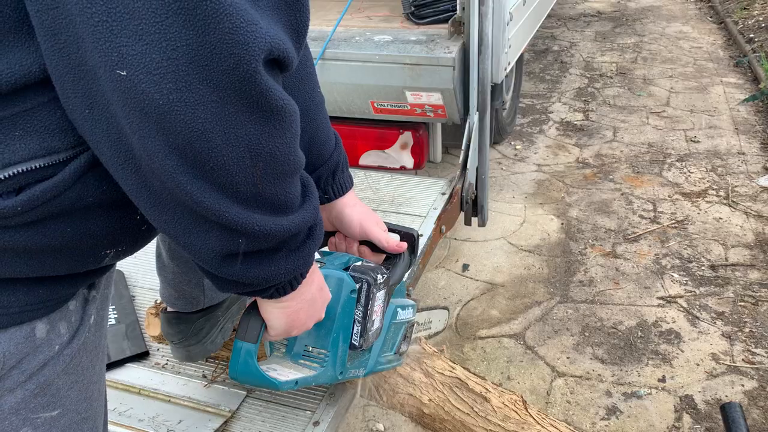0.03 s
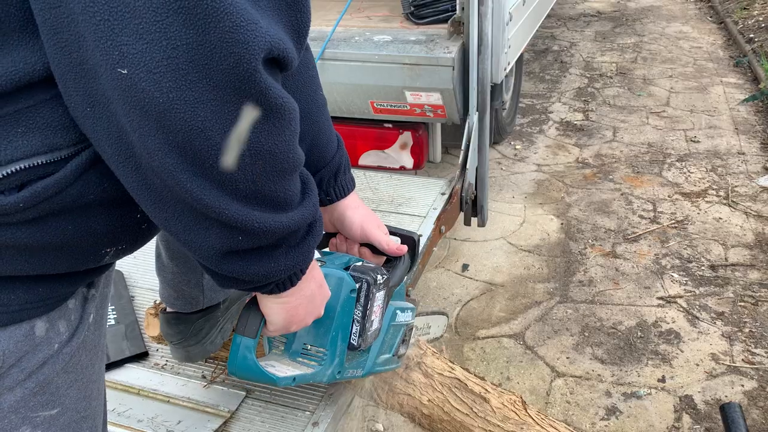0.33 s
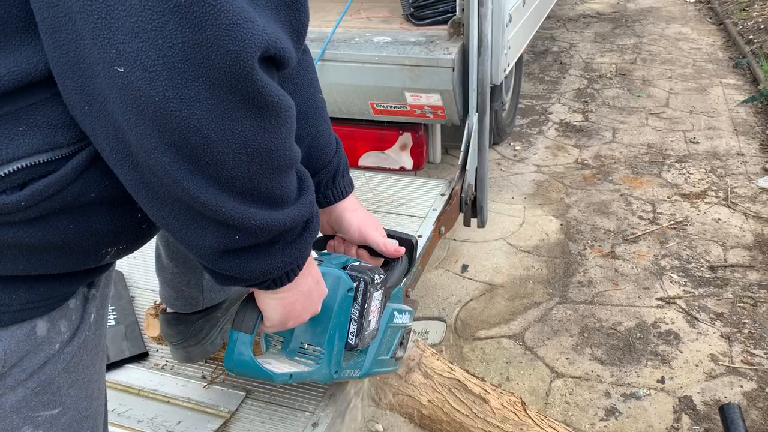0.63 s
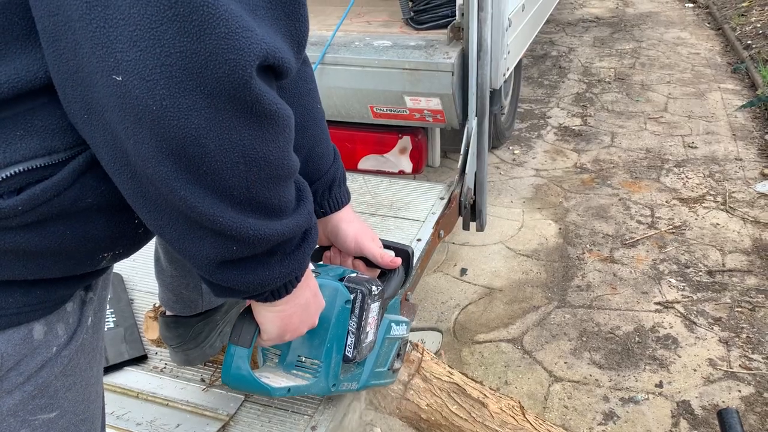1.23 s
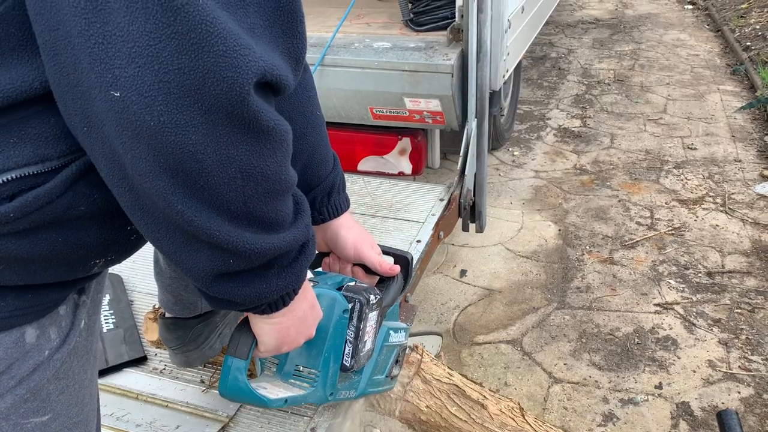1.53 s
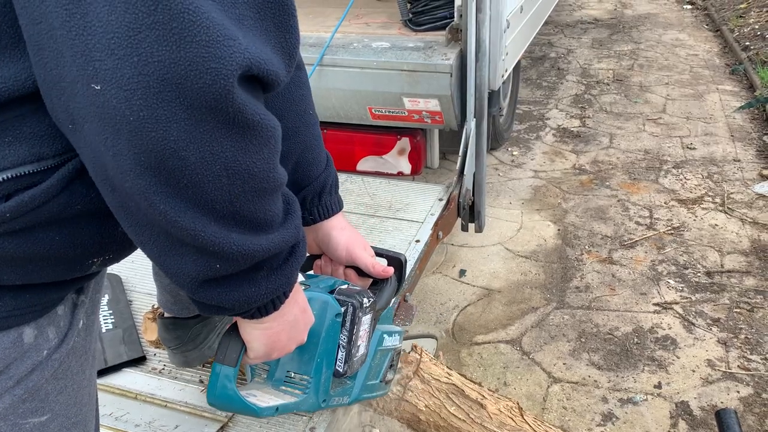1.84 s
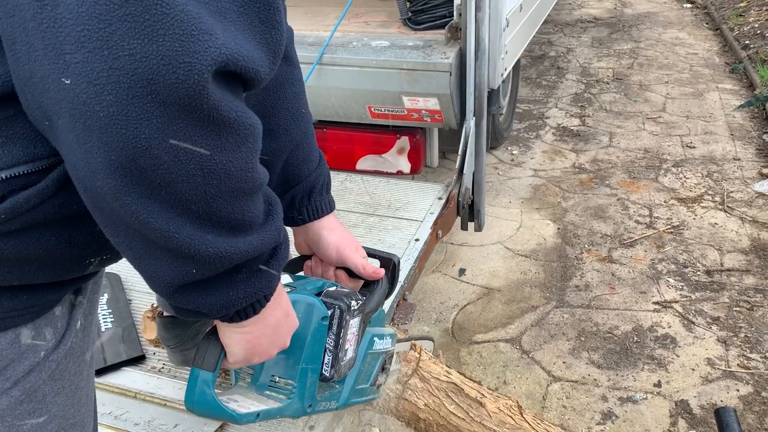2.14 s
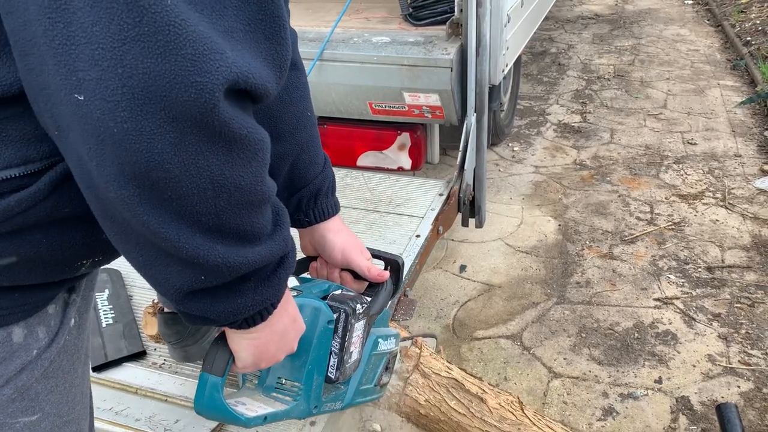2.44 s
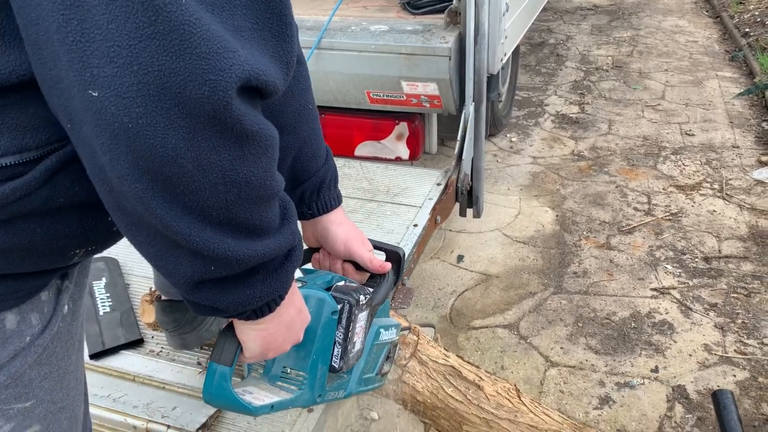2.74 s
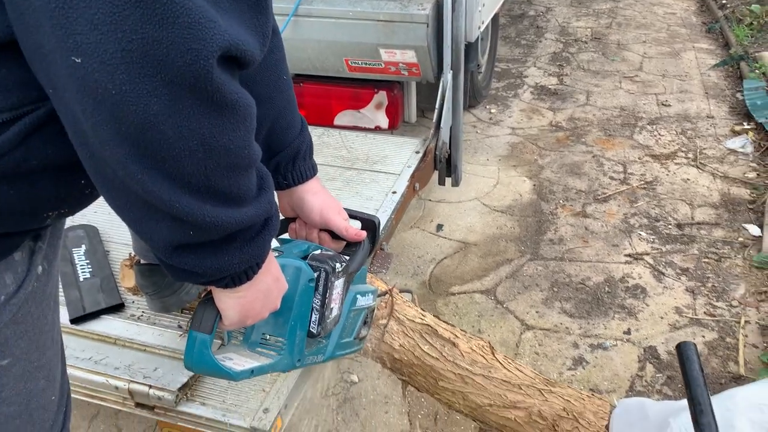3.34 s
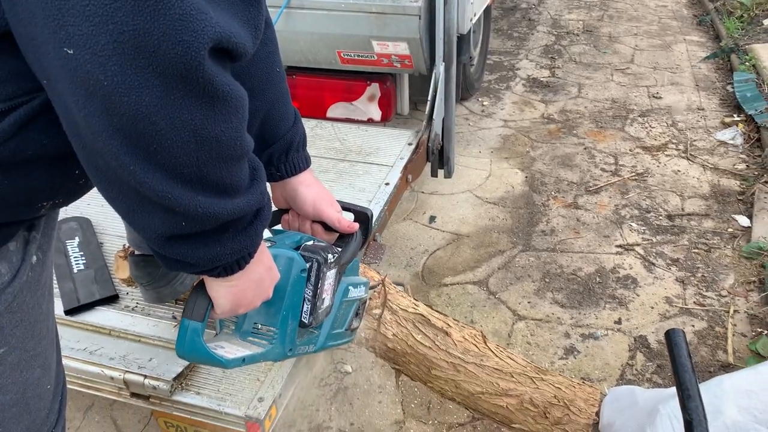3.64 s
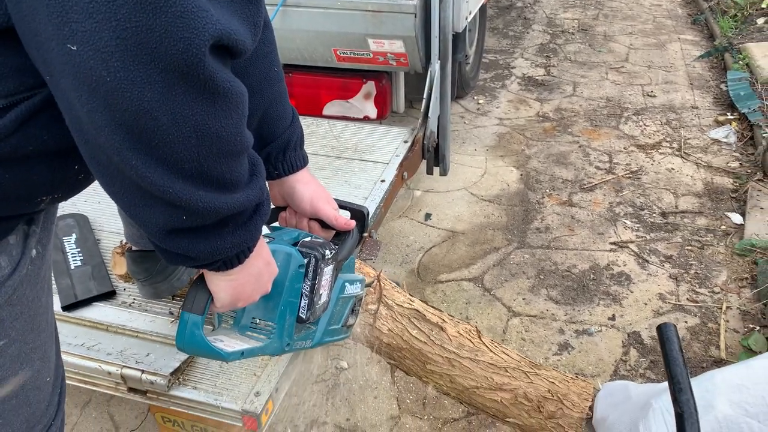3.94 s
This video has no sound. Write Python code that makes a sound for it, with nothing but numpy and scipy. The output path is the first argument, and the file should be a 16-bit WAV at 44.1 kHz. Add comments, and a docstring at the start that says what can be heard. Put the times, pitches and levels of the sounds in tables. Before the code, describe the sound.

Close electric chainsaw whining and rasping steadily as its chain bites into a log outdoors.

```python
"""After a moment of silence the sound cuts in on a running cordless chainsaw, close by on a paved yard.
Chain links meet a six-tooth drive wheel, whining and knocking on the housing,
while the chain rattles and hisses along its bar and chips crackle. The whine sinks under load.
From 0.8 s the cutters bite the log in spells, and the saw bounces and chatters in the cut.
Near the end two thin, high notes ring out briefly. A faint outdoor rumble lies under it all."""
import sys
import numpy as np
from scipy import signal
from scipy.fft import rfft, irfft
from scipy.io import wavfile
from scipy.ndimage import map_coordinates

SR = 44100
rng = np.random.default_rng(int(sys.argv[2]) if len(sys.argv) > 2 else 0)


def master(y):
    """Save y as 16-bit WAV."""
    cut = np.clip(np.atleast_2d(y).T, -1, 1)
    pcm = np.round(cut * 32767)  # scale
    wavfile.write(sys.argv[1], SR, pcm.astype(np.int16))


N = 176400
TIME = np.arange(N) / SR
FREQS = np.maximum(np.arange(N // 2 + 1) * SR / N, 1)


# how often links meet the drive wheel: t/s, f/Hz
LINK_RATE = [(0.0, 1059), (0.25, 1031), (0.42, 1004), (0.73, 985.7), (0.99, 960.8), (1.22, 952.9),
             (1.35, 936.5), (1.48, 926.2), (1.61, 934.2), (1.75, 923.1), (2.09, 941.3), (2.35, 940.5),
             (2.5, 952.3), (2.9, 944.2), (3.05, 964.4), (3.15, 935.4), (3.28, 964.8), (3.47, 953.5),
             (3.56, 930), (3.75, 915.6), (3.9, 885.4), (4.0, 904)]

def chain_motion():
    """The chain slows under load. Gives its link rate and a slightly wobbly count of links passed."""
    link_hz, = in_time(LINK_RATE)
    return link_hz, np.cumsum(link_hz * (1 + 0.00397 * drift(45))) / SR


# strength of the whine's tones 1, 2, 3 and 5: t/s, then level/dB for each
WHINE_LEVELS = [(0.06, -28, -46.5, -39, -31), (0.27, -30, -51, -32, -36.5), (0.42, -36.5, -43, -43.5, -39),
                (0.7, -37, -42.5, -37.5, -45), (0.88, -54, -42.5, -38.5, -42), (1.18, -55, -44, -36, -48),
                (1.32, -40.5, -58, -44, -53), (1.7, -40.5, -41, -43, -55), (2.1, -45.5, -61, -49, -46),
                (2.45, -42, -51, -49, -52), (2.75, -41, -47, -47, -46), (3.05, -38, -44, -40, -41),
                (3.15, -41, -45, -44, -42), (3.42, -40, -44, -36, -43), (3.6, -41, -43, -49, -45),
                (3.95, -43, -50, -55, -56)]
# tones 1 to 5: added level/dB, phase jitter/rad
WHINE_TONES = [(0.9, 0.04), (0.3, 0.32), (-2, 0.1), (-3, 0.8), (1.5, 0.41)]
FLICKER_DB = 1.5

def whine(links):
    """Links meeting the wheel make tones at 1 to 5 times their rate; jitter makes them rough."""
    first, second, third, fifth = in_time(WHINE_LEVELS)
    levels = [first, second, third, second, fifth]
    out = 0
    for k, (db, (added_db, jitter)) in enumerate(zip(levels, WHINE_TONES), start=1):
        phase = 2 * np.pi * (k * links + rng.random()) + jitter * drift(55)
        out = out + np.sqrt(2) * from_db(db + added_db + FLICKER_DB * drift(16)) * np.sin(phase)
    return out


# tones from uneven teeth: multiple of the wheel's turning rate, level/dB
WHEEL_TONES = [(1, -59.5), (7, -47.5), (8, -48), (9, -50), (10, -44.5), (11, -50), (13, -49.5), (15, -65),
               (22, -44), (28, -47), (29, -47)]

def wheel_tones(links, fade_db_per_s=1.5):
    """Uneven teeth add weak tones that fade as the cut deepens."""
    turns = links / len(TOOTH_STRIKES)
    out = 0
    for multiple, db in WHEEL_TONES:
        gain = from_db(db + FLICKER_DB * drift(21))
        out = out + gain * np.sin(2 * np.pi * (round(multiple) * turns + rng.random()))
    return np.sqrt(2) * from_db(-fade_db_per_s * TIME) * out


# how much harder (+) or softer (-) than usual each of the six teeth strikes
TOOTH_STRIKES = [0.58, -0.37, 0.4, -0.79, 0.27, -0.66]

def knocks(links, scatter=0.59):
    """Each link knocks once; its strength depends on the tooth and on chance."""
    hits = np.flatnonzero(np.diff(np.floor(links)))
    clicks = np.zeros(N)
    clicks[hits] = np.resize(TOOTH_STRIKES, len(hits)) + scatter * rng.standard_normal(len(hits))
    return rms_one(clicks)


def friction(links, bouncing, chips_per_s=810, chip_decay_s=0.00022):
    """Pulsing scrapes and snapping chips. Rows: direct, scattered left, scattered right."""
    pulsing = (1 + 0.22 * np.cos(2 * np.pi * links)) * (1 + 0.049 * bouncing)
    flutter_db = 0.37 * drift(60) + 0.56 * drift(21)
    pressure = rms_one(pulsing * from_db(flutter_db))
    snaps = rng.random(N) < chips_per_s / SR
    chips = snaps * from_db(3.5 * np.minimum(rng.exponential(1, N), 4))
    bursts = rms_one(signal.lfilter([1], [1, -np.exp(-1 / (chip_decay_s * SR))], chips + 1e-18))
    return rms_one(np.hypot(pressure, 0.28 * bursts) * rng.standard_normal((3, N)))


# tone colour of the running chain: f/Hz, level/dB
CHAIN_COLOUR = [(130, -16.5), (260, -7.5), (370, -14.5), (580, -9.5), (690, -12), (790, -7), (870, -11.5),
                (1400, -7.5), (2080, -7), (2300, -9.5), (2600, -9.5), (2780, -9), (3050, -6), (4000, -9),
                (4450, -8), (4900, -1.5), (5300, -3.5), (5800, -9), (7000, -8.5), (7880, -8.5), (8060, 0.5),
                (9200, 0.5), (10100, -6.0), (11700, -5.5), (13000, -7), (13400, -10), (14400, -12),
                (15300, -75)]
# the top of the hiss (t/s, level/dB) and where that top begins
TOP_HISS, TOP_FROM_HZ = [(0, 1), (1.5, 0.96), (2.4, -2), (3.2, -1.14), (4, -1.3)], 9300

def chain(scrape, rattle_db, hiss_db):
    """The chain runs along the bar with a broad rattle and a brighter hiss."""
    colour_db, = in_hz(CHAIN_COLOUR)
    top_db, = in_time(TOP_HISS)
    bass_cut = 1 / np.hypot(1, (119 / FREQS) ** 4)
    noise = irfft(rfft(scrape) * from_db(colour_db - 17) * bass_cut, N)
    rattle, bright = split(noise, hz=2400)
    hiss, top = split(bright, TOP_FROM_HZ)
    return from_db(rattle_db) * rattle + from_db(hiss_db) * (hiss + from_db(top_db) * top)


# the housing's low and high ringing notes: f/Hz, width/Hz, level/dB
LOW_NOTES = [(981, 130, -4.5), (1168, 55, 4), (1247, 54, -2.5)]
HIGH_NOTES = [(1597, 80, -2), (1676, 56, 2), (1787, 41, -6.5), (1903, 68, -5.5)]
# bending of the low notes: t/s, pitch ratio
LOW_BEND = [(0, 1.04), (.55, 0.99), (1.15, 1), (1.5, 1.0), (2, 0.993), (2.25, 0.98), (3, 1.04),
            (3.4, 1.084), (3.55, 1.04), (4, 0.96)]
# the high notes against the low ones: t/s, level/dB
HIGH_LEVEL = [(0, 0.5), (.6, -5.5), (1.1, -3.5), (1.9, -2.5), (2.4, -1.5), (2.9, 2), (3.4, 0.5), (4, 2)]

def housing(links, scrape, ring_db):
    """Knocks and scrapes ring the housing; its low notes bend as the saw is pressed into the log."""
    bend, = in_time(LOW_BEND)
    high_db, = in_time(HIGH_LEVEL)
    shaking = np.array([knocks(links) for _ in range(3)]) + 0.67 * scrape
    low = resonate_bending(shaking, LOW_NOTES, bend)
    high = from_db(high_db) * resonate(shaking, HIGH_NOTES)
    return from_db(ring_db - 39.5) * (low + high)


# the bar's ringing notes: f/Hz, width/Hz, level/dB
BAR_NOTES = [(2146, 46, -5), (2470, 79, 2), (2637, 99, 2), (2854, 61, -4), (3220, 30, -1), (3310, 90, -2),
             (3554, 120, 1.5), (3680, 46, 1), (3850, 55, -10), (4146, 130, 2), (4640, 68, 1),
             (4840, 130, 0), (4960, 65, 2.5), (5280, 190, 3.5), (5640, 110, 1), (6060, 90, -3.5),
             (6550, 110, -7.5), (6860, 120, -5), (8670, 160, 3)]
# the top of that ring (t/s, level/dB) and where that top begins
BAR_TOP, BAR_TOP_FROM_HZ = [(0, 5), (.5, 4), (1.9, 4), (2.7, -.5), (3.2, 1.5), (4, -2)], 4000

def guide_bar(scrape):
    """Scraping rings the bar that guides the chain."""
    top_db, = in_time(BAR_TOP)
    low, top = split(resonate(scrape, BAR_NOTES), BAR_TOP_FROM_HZ)
    return from_db(-34.5) * (low + from_db(top_db) * top)


# how hard the saw works: t/s, rattle level/dB, hiss level/dB, housing level/dB
WORK_LEVELS = [(.04, 0, 1.1, -3), (.27, -1, -0.2, 0), (.38, -2, -1.2, -1), (.5, 1.5, -0.5, -1.5),
               (.56, 1.5, 0, 6), (.64, -1.5, -1.5, -1.5), (.8, 1.5, 0, 3.5), (1.12, -1.5, -1.3, 1),
               (1.35, -0.5, 0, 4), (1.6, 1, 0.5, 4.5), (2.12, -0.5, 0.8, 3.5), (2.3, 1, 0.6, 4),
               (2.47, 1.5, 2.1, 5.5), (2.75, -0.5, 1.6, 4), (3.0, 0.2, 0.2, 0.5), (3.2, -1.5, 0.5, 0),
               (3.48, -1.5, 0, 1.5), (4, 1.5, 1.5, -3)]

def rasp(links, bouncing, swell_db=1.6):
    """Chain, housing and bar blend into a rasp whose narrow treble bands each swell and fade."""
    rattle_db, hiss_db, ring_db = in_time(WORK_LEVELS)
    running = chain(friction(links, bouncing), rattle_db, hiss_db)
    scrape = friction(links, bouncing)
    out = running + housing(links, scrape, ring_db) + guide_bar(scrape)
    spectrum = rfft(out)
    edges_hz = np.geomspace(2000, 7000, 29)
    for low, high in zip(edges_hz, edges_hz[1:]):
        band = irfft(spectrum * ((FREQS >= low) & (FREQS < high)), N)
        swell = rms_one(from_db(swell_db * drift(6)))
        out = out + band * (swell - 1)
    return out


# spells of hard biting: start t/s, length/s, level/dB
BITE_SPELLS = [(0.808, 0.067, 1), (0.905, 0.12, -3), (1.28, 0.2, -1), (1.474, 0.23, 0.5), (1.782, .2, 0.5),
               (2.063, 0.14, 0), (2.302, 0.21, 3), (2.526, 0.32, 1), (2.853, 0.089, -4), (3.073, .12, 2),
               (3.22, 0.099, -7), (3.43, 0.16, 0.5), (3.605, 0.14, -1), (3.765, 0.23, 2)]

def cutter_grip(edge_s=0.03, gliding_db=-11):
    """How hard the cutters grip the wood, as a gain: spells of biting over light gliding."""
    spells = 0
    for start, length, db in BITE_SPELLS:
        inside_s = np.minimum(TIME - start, start + length - TIME)
        spells = spells + from_db(db) * np.clip(inside_s / edge_s + .5, 0, 1)
    return np.hypot(from_db(gliding_db), spells)


# hums of the bouncing saw: f/Hz, level/dB
BOUNCE_HUMS = [(221, 1), (447, -4.5)]

def bounce(link_hz):
    """Cutters bouncing in the cut make two unsteady hums that sink a little as the chain slows."""
    sag = (link_hz / np.median(link_hz)) ** .45
    out = 0
    for hz, db in BOUNCE_HUMS:
        gain = from_db(db + 3.5 * drift(53))
        pitch_hz = hz * sag * (1 + 0.0196 * drift(26))
        out = out + gain * np.sin(2 * np.pi * np.cumsum(pitch_hz) / SR)
    return rms_one(out)


# ringing notes of saw and log together: f/Hz, width/Hz, level/dB
CHATTER_NOTES = [(215, 84, -5), (461, 39, 9.5), (173, 26, -33), (588, 21, 3.5), (830, 44, -17)]

def chatter(grip):
    """Saw and log shake in the cut, louder as the cutters grip."""
    ringing = resonate(rng.standard_normal((3, N)), CHATTER_NOTES)
    _, above_bass = split(from_db(-48) * grip * ringing, hz=125)
    return above_bass


# brief high overtones: t/s, f/Hz, level/dB
HIGH_OVERTONES = [(3.58, 5700, -41), (3.92, 3570, -37)]

def overtones(swell_s=0.13, width_hz=18):
    """Two high overtones of the whine ring out briefly, thin and squealing."""
    out = 0
    for peak_s, hz, db in HIGH_OVERTONES:
        swell = from_db(db) * np.exp(-((TIME - peak_s) / swell_s) ** 2)
        out = out + swell * resonate(rng.standard_normal(N), [(hz, width_hz, 0)])
    return out


# how the two sides differ: f/Hz, left-minus-right level/dB, likeness/0-1, left lead/rad
LEFT_RIGHT = [(200, -1.7, 0.97, -0.1), (450, -4.9, 0.84, -0.2), (700, -4.6, 0.64, -0.1),
              (1200, -2.5, 0.94, -0.7), (1700, -0.9, 0.92, -0.2), (2400, 0.0, 0.91, 0.0),
              (3100, -0.1, 0.62, 0.1), (3600, -0.6, 0.86, 0.2), (4200, -0.4, 0.83, 0.2),
              (4900, -3.5, 0.81, 1.5), (5300, -4.9, 0.74, 1.6), (5900, -2.3, 0.65, 0.3),
              (6800, -1.4, 0.55, 1.0), (7400, -1.0, 0.24, 1.3), (7880, -0.3, 0.48, -0.1),
              (8080, -9.1, 0.59, 0.0), (8700, -10.7, 0.62, 1.5), (9300, -10.9, 0.54, 2.6),
              (9850, -4.9, 0.09, -0.8), (10700, -2.7, 0.65, -1.4), (12000, -0.0, 0.96, -3.1),
              (13300, -0.0, 1.0, -6.2), (14400, 0.1, 0.58, -8.5)]

def stereo(tones, noise):
    """Set left-right level, likeness and phase by frequency; the yard scatters sound to each side."""
    balance_db, share, lead = in_hz(LEFT_RIGHT)
    sides = np.array([[1], [-1]])
    spectra = rfft(noise)
    gain = from_db(sides * balance_db / 2)
    gain = gain / np.sqrt(np.mean(gain ** 2, axis=0))
    # the top treble is nearly the same on both sides, but shifted in phase
    common = (rfft(tones) + np.sqrt(share) * spectra[0]) * np.exp(.5j * sides * lead)
    scattered = np.sqrt(1 - share) * spectra[1:]
    return irfft(gain * (common + scattered), N)


# the saw's drift across the microphones: t/s, extra left lead/samples
SAW_DRIFT = [(0, -0.72), (1.8, -0.22), (2.7, 0.033), (3.1, 0.71), (4, 1.2)]

def sway(pair):
    """As the saw sinks, all but the top of its sound shifts in time between left and right."""
    lead, = in_time(SAW_DRIFT)
    low, top = split(pair, TOP_FROM_HZ)
    shifted = [map_coordinates(channel, [np.arange(N) + side * lead / 2], order=3, mode="nearest")
               for channel, side in zip(low, (1, -1))]
    return top + np.array(shifted)


# tone colour of the outdoor rumble: f/Hz, level/dB
RUMBLE_COLOUR = [(15, -36), (30, -8), (50, -1.5), (65, 10.5), (95, -31), (140, -4), (300, -43), (2000, -60)]

def rumble(fade_db_per_s=1.5):
    """A low, slowly fading outdoor noise, nearly the same on both sides."""
    colour_db, = in_hz(RUMBLE_COLOUR)
    air = rng.standard_normal(N) + .25 * rng.standard_normal((2, N))
    return from_db(-fade_db_per_s * TIME) * irfft(rfft(air) * from_db(colour_db - 39.5), N)


def from_db(db):
    """Turn decibels into a gain."""
    return 10 ** (np.asarray(db) / 20)


def rms_one(x):
    """Scale to an average strength (rms) of 1."""
    return x / np.sqrt(np.mean(x ** 2) + 1e-20)


def in_time(rows):
    """Fill in a table's columns at every sample."""
    times, *columns = np.transpose(rows)
    return [np.interp(TIME, times, column) for column in columns]


def in_hz(rows):
    """Fill in a table's columns at every frequency."""
    hz, *columns = np.transpose(rows)
    return [np.interp(np.log(FREQS), np.log(hz), column) for column in columns]


def drift(rate_hz):
    """A smooth random wander of size about 1, mostly slower than rate_hz."""
    coarse = rfft(rng.standard_normal(N // 20))
    slow = rms_one(irfft(coarse / (1 + (FREQS[:len(coarse)] / rate_hz) ** 2)))
    return np.interp(np.arange(N) / 20, np.arange(len(slow)), slow)


def split(x, hz):
    """The parts below and above a frequency."""
    low = irfft(rfft(x) / (1 + (FREQS / hz) ** 12), N)
    return low, x - low


def resonate(x, notes):
    """Let x ring a set of notes, added with alternating signs; narrow notes ring longer."""
    out = 0
    for k, (hz, width, db) in enumerate(notes):
        decay = np.exp(-np.pi * width / SR)
        feedback = [1, -2 * decay * np.cos(2 * np.pi * hz / SR), decay * decay]
        ring = signal.lfilter([1, 0, -1], feedback, x)
        out = out + (-1) ** k * from_db(db) * rms_one(ring)
    return rms_one(out)


def resonate_bending(x, notes, ratio):
    """Let x ring a set of notes whose pitches all follow one changing ratio."""
    clock = np.cumsum(ratio) / SR
    out = 0
    for k, (hz, width, db) in enumerate(notes):
        spin = np.exp(2j * np.pi * hz * clock)
        ring = spin * signal.lfilter([1], [1, -np.exp(-np.pi * width / SR)], x * spin.conj())
        out = out + (-1) ** k * from_db(db) * rms_one(ring.real)
    return rms_one(out)


def scene():
    """The saw in the log, over a faint rumble."""
    link_hz, links = chain_motion()
    grip = cutter_grip()
    bouncing = grip * bounce(link_hz)
    noise = chatter(grip) + rasp(links, bouncing)
    tones = whine(links) + wheel_tones(links) + from_db(-43) * bouncing + overtones()
    return sway(stereo(tones, noise)) + rumble()


def record(dry, start_s=.036, cutoff_hz=15300):
    """The sound cuts in after a moment of silence; its highest treble is removed."""
    fade_in = np.clip((TIME - start_s) / .001, 0, 1)
    treble_cut = signal.ellip(12, .1, 80, cutoff_hz, fs=SR, output="sos")
    return signal.sosfilt(treble_cut, dry * fade_in)


dry = scene()
out = record(dry)
master(out)
```